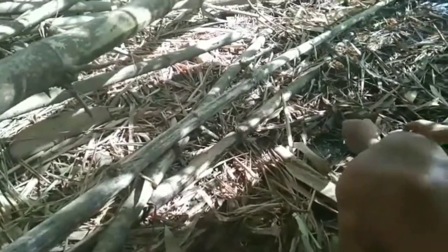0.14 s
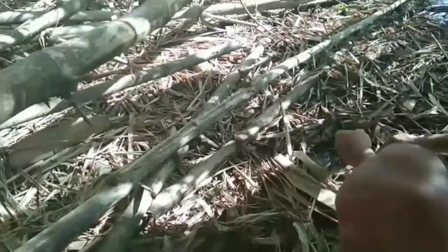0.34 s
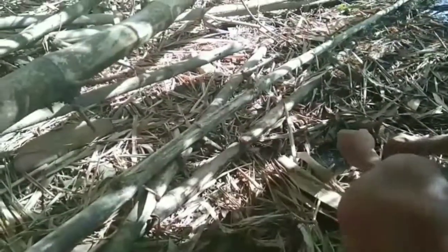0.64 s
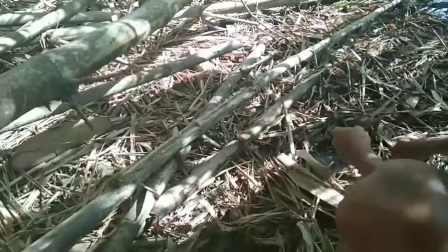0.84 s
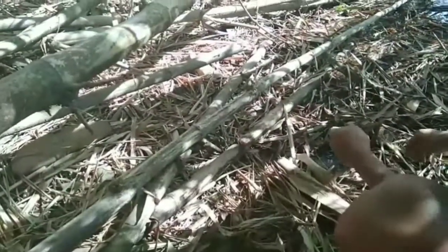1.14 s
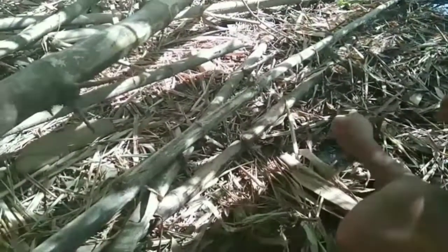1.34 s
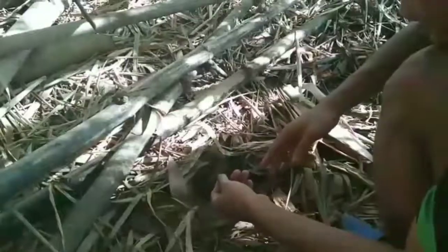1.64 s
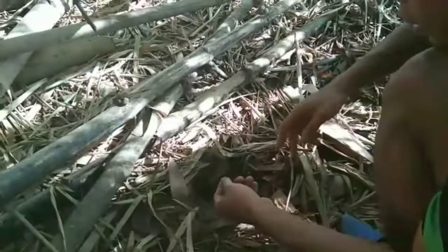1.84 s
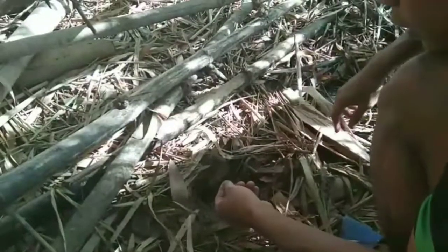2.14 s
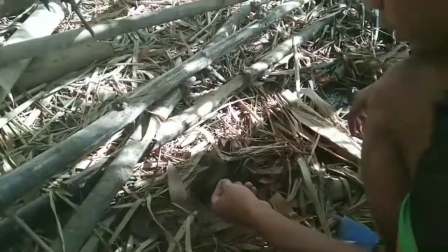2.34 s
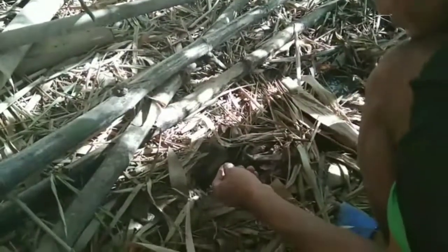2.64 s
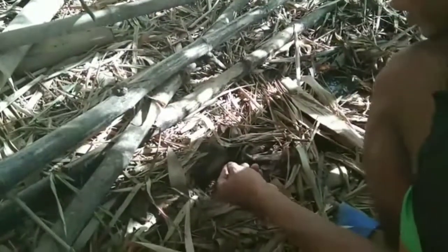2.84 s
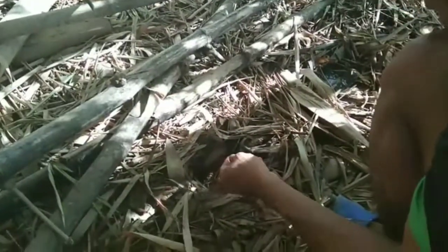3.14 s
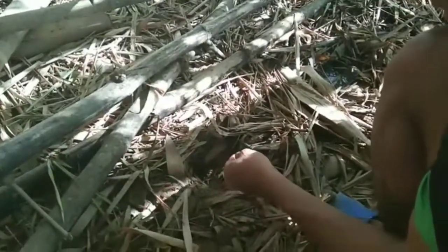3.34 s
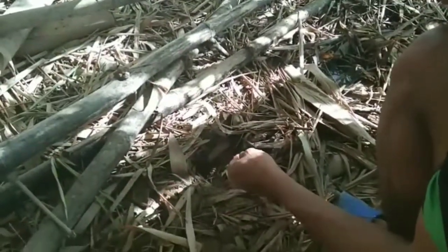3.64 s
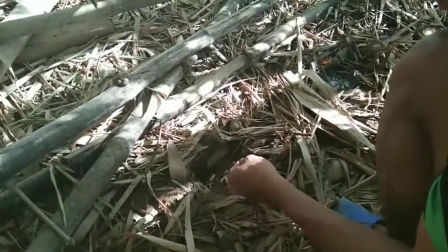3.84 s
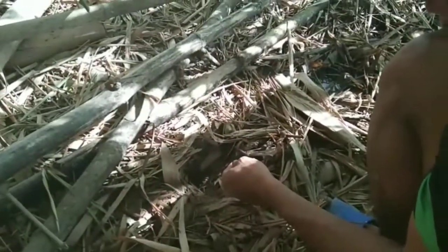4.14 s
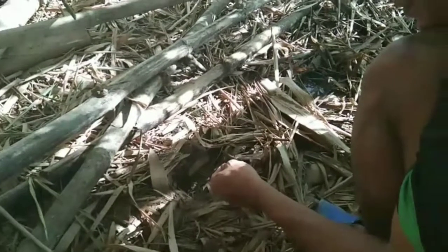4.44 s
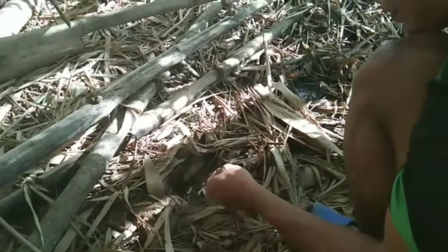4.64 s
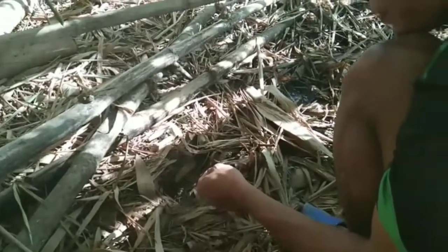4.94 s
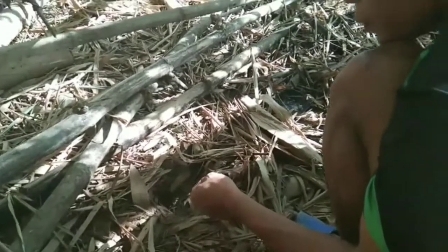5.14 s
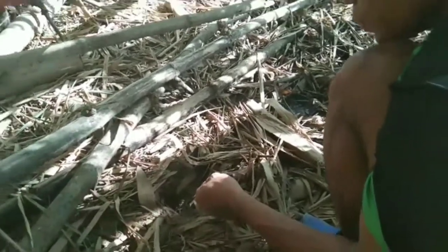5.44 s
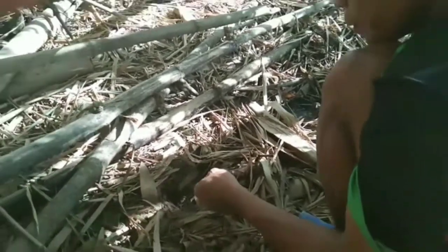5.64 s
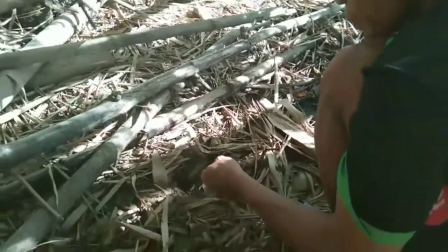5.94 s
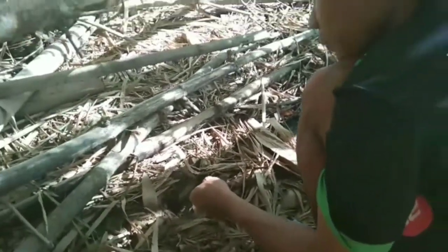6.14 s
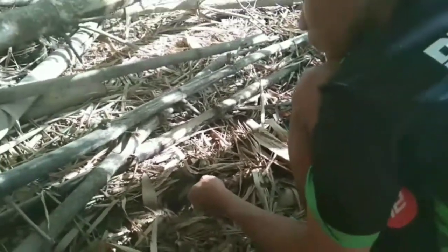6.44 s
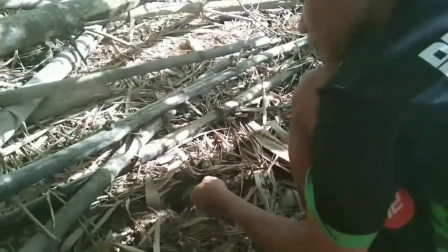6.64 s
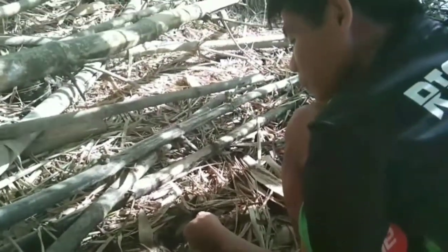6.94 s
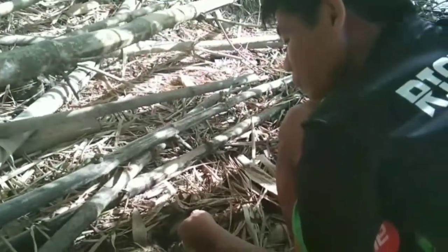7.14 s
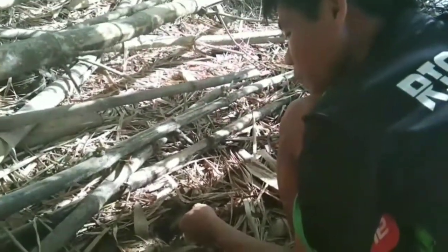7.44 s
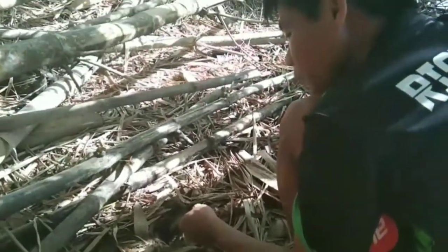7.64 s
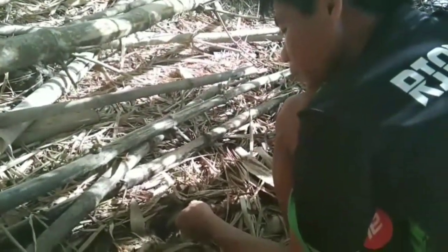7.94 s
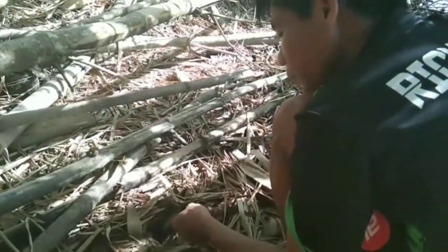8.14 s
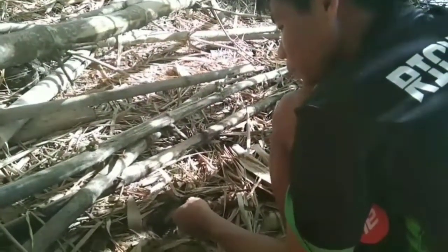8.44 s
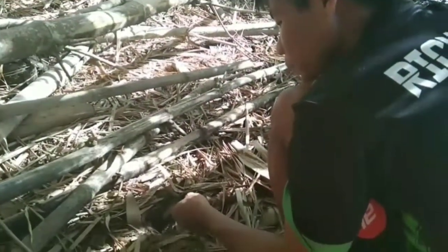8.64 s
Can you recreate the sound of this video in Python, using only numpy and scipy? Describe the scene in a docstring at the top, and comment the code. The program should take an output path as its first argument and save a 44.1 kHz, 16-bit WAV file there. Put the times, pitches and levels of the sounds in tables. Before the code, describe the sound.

A hand rummages in dry leaf litter in a bamboo grove, close to one small microphone, over a soft, steady high hiss of distant leaves and insects and a very faint rumble of air. The rustling starts lightly. From 0.5 to 1.5 seconds a bamboo pole creaks in a slow string of ringing ticks. Crunching then grows, with a crisp snap at 1.8 seconds, hissy sliding leaves, and the loudest crack at 2.7 seconds. From about 3.3 to 4.7 seconds the hand is quieter, leaving scattered clicks and faint hollow knocks. A second busy spell runs from 4.8 to 6.3 seconds, with a sharp snap at 5.3 and a leaf scraping after it. Lighter crackling and tiny splinter ticks follow, then a cluster of snaps between 7.5 and 8 seconds. A few small grabs and clicks continue until nearly 9 seconds.

```python
"""Bamboo grove: a hand works in dry leaf litter under fallen culms, close to one small microphone.
Leaves crunch and hiss in clumps of tiny breaks, and sing in narrow bands as they slide.
A culm creaks in slow stick-slip, each slip ringing its modes. Stalks snap, splinters tick,
hollow pieces knock. Behind: the steady hiss of the grove and a low rumble of air."""
import sys
import numpy as np
from scipy import signal
from scipy.io import wavfile
from scipy.ndimage import uniform_filter1d

SR = 44100
rng = np.random.default_rng(int(sys.argv[2]) if len(sys.argv) > 2 else 0)


def unload_wav(signal):
    """Save mono or channel-first audio to the path in sys.argv[1] as 16-bit WAV at rate SR, clipped to [-1, 1]."""
    wavfile.write(
        sys.argv[1],
        SR,
        np.round(np.clip(np.atleast_2d(signal).T, -1, 1) * 32767).astype(np.int16),
    )


N = 388080

# hand in the litter: (time [s], crunch [dB], crunch centre [Hz], stir [dB], hiss [dB], hiss centre [Hz])
HAND_PATH = [(0, -57, 2350, -70.5, -56.5, 6900), (.42, -59.5, 2320, -67, -56, 6900),
             (1.45, -57, 2230, -64, -55.5, 6450), (1.9, -53.5, 2300, -67.5, -51.5, 6100),
             (2.01, -50, 2400, -70, -51, 6700), (2.12, -49.5, 2650, -62, -45, 6900),
             (2.35, -48.5, 2400, -65.5, -45, 6930), (2.44, -52, 2010, -64, -50, 6750),
             (2.63, -45, 2210, -63.5, -45.5, 6800), (2.88, -46.5, 2140, -62, -39.5, 6840),
             (2.93, -52, 2080, -60.5, -49, 6700), (3.1, -46.5, 2780, -65, -41.5, 7000),
             (3.22, -50.5, 2360, -64, -47.5, 6800), (3.5, -58.5, 2300, -72, -52.5, 6550),
             (4.0, -63.5, 2400, -78, -58, 6160), (4.7, -56.5, 2380, -68.5, -54.5, 6360),
             (5.0, -46, 2460, -58.5, -45, 6900), (5.1, -52.5, 2580, -58, -49.5, 6800),
             (5.29, -44.5, 2400, -54.5, -42, 6800), (5.79, -53.5, 2280, -65, -51, 6640),
             (6.25, -51, 2180, -59.5, -49.5, 6650), (6.4, -57, 2230, -68, -52.5, 6470),
             (7.3, -57.5, 2420, -67.5, -54.5, 6600), (7.65, -58, 2380, -71.5, -54.5, 6370),
             (7.95, -48, 2320, -66, -46, 6860), (8.05, -52.5, 2270, -68, -49.5, 6900),
             (8.55, -55.5, 2450, -74, -52.5, 6600), (8.8, -57, 2310, -65, -54, 6760)]
# finger grabs: (time [s], crunch [dB], crunch centre [Hz], hiss [dB], t60 [s])
FINGER_GRABS = [(.04, -56, 2500, -47.5, 0.13), (.49, -48, 2500, -56, 0.4), (.62, -53.5, 2300, -47.5, 0.32),
                (.94, -52, 2300, -50, 0.3), (1.515, -48.5, 1600, -49, 0.11), (1.597, -43, 1660, -48, 0.17),
                (1.689, -45.5, 1600, -47, 0.25), (1.814, -41, 1700, -45, 0.15),
                (1.943, -43.5, 1690, -60, 0.092), (1.983, -42.5, 1700, -52, 0.06),
                (2.101, -42.5, 1600, -56, 0.21), (2.263, -44, 1500, -53, 0.11),
                (2.413, -44.5, 1500, -63, 0.14), (2.487, -44, 1300, -49, 0.095),
                (2.54, -49.5, 1400, -46, 1), (2.899, -38, 2600, -39, .08), (3.66, -53.5, 2100, -58, 0.32),
                (4.035, -52, 2570, -46, 0.62), (4.24, -50, 2450, -45, 0.23), (4.43, -58, 2400, -48, 0.47),
                (4.55, -62, 2450, -54, .2), (4.615, -56, 2300, -50, 0.11), (4.785, -49, 1400, -59, 0.29),
                (4.87, -43, 2350, -58, 0.081), (5.13, -55, 2500, -43.5, 0.28),
                (5.72, -51, 2300, -44.5, 0.2), (5.88, -52.5, 2260, -50, 0.33), (6.2, -63, 2200, -47, 0.16),
                (6.43, -50.5, 2330, -49.5, 0.21), (6.66, -55.5, 2240, -55, 0.36),
                (6.93, -56.5, 2360, -55, 0.62), (7.36, -52.5, 2220, -63, 0.16),
                (8.28, -58, 2250, -58, 0.27), (8.39, -47, 2300, -47, 0.12), (8.709, -46, 1920, -48, 0.15)]
# leaf spectra: (frequency [Hz], density [dB])
CRUNCH_SPECTRUM = [(400, -27.5), (800, -4.5), (1400, -2.5), (2400, 1.5), (3300, -2.5), (4500, -1),
                   (6500, -30.5)]
STIR_SPECTRUM = [(120, -30), (250, -3), (340, 0), (450, -3), (600, -5), (800, -11), (1500, -29)]
HISS_SPECTRUM = [(2060, -18), (3500, -5.5), (5060, -1), (7270, 1), (7700, 0.5), (8450, -4.5), (10900, -19),
                 (12000, -27.5), (14800, -19), (15600, -21)]
# stiff leaves ringing in the crunch: (frequency [Hz], width [Hz], level [dB])
STIFF_LEAF_BANDS = [(1310, 730, 7.5), (2070, 1100, -1), (2970, 770, 1)]
# static treble resonances that colour the rustling hiss: (frequency [Hz], width [Hz], level [dB])
HISS_BANDS = [(4500, 500, 5), (5660, 740, -0.5), (7400, 780, -3)]
# stalks and leaves breaking:
# (time [s], ring peak [dB], ring [Hz], crack peak [dB], crack [Hz], drag [0 clean, 1 slow tear])
STALK_SNAPS = [(.2565, -50, 2300, -39, 5200, .04), (1.5482, -38, 2250, -40, 7240, .04),
               (1.6163, -45, 1650, -30.5, 4680, .048), (1.7644, -45, 2280, -32, 5500, 0.17),
               (1.809, -18.5, 2200, -22, 4360, 0.16), (1.9379, -32.5, 2060, -34, 5760, .32),
               (2.036, -31.5, 2460, -31, 7300, 0.41), (2.0954, -30, 2860, -46, 7160, 0.78),
               (2.1303, -41, 2440, -30, 6870, .04), (2.4077, -30, 2900, -49, 6640, 0.27),
               (2.529, -27.5, 1620, -35, 6960, 1), (2.5422, -29, 1500, -38, 6900, 0.26),
               (2.562, -27.5, 1480, -37, 6890, 1), (2.583, -27.5, 2830, -42, 7210, 0.26),
               (2.6878, -16, 2250, -10, 4170, 0.13), (2.706, -31, 1900, -27, 4410, 0.36),
               (2.74, -38, 1560, -41, 7200, 0.21), (2.775, -37, 2200, -31, 4500, .04),
               (2.852, -38, 2200, -34, 4560, .4), (2.877, -32.5, 2500, -31, 6010, 0.68),
               (2.901, -32, 1380, -29, 4500, 0.61), (2.958, -33, 1300, -26, 7900, 0.094),
               (3.0805, -28, 2930, -34, 5850, 0.44), (3.1534, -27.5, 2780, -31, 7630, .04),
               (3.7764, -37.5, 2240, -39, 5560, .04), (4.028, -40, 2070, -33, 6040, 0.84),
               (4.236, -37.5, 2820, -40, 5760, 0.12), (4.552, -37.5, 2460, -36, 6000, 0.41),
               (4.859, -32, 2600, -25, 7050, 0.24), (4.881, -31, 1650, -35, 4870, 0.043),
               (4.9051, -28.5, 1670, -22.5, 5140, 0.092), (4.9635, -40, 2590, -26, 7600, .04),
               (4.9956, -32, 2400, -29, 7640, 0.27), (5.1226, -35, 2800, -35, 7160, 0.27),
               (5.158, -36, 2610, -38, 6800, .3), (5.177, -34, 2250, -40, 6800, .1),
               (5.188, -29.5, 2280, -28, 6840, 0.054), (5.249, -36, 1500, -41, 7000, .1),
               (5.2844, -13, 2300, -23, 4170, 0.089), (5.2913, -28, 2100, -36, 4250, .1),
               (5.337, -28, 2260, -29, 7160, .04), (5.3584, -32, 2250, -40, 7740, 0.2),
               (5.4805, -31, 2550, -42, 6030, .04), (5.51, -28, 2270, -38, 7430, 0.044),
               (5.643, -35, 2380, -47, 6190, 0.17), (5.657, -31, 2230, -47, 5220, 0.12),
               (5.6678, -34, 2000, -35, 7200, .04), (5.723, -36, 2190, -36, 6080, .04),
               (5.784, -32, 3040, -39, 6660, .04), (5.873, -40, 2480, -30, 6050, .46),
               (5.8875, -39, 2220, -26, 5900, .04), (5.982, -42, 1630, -39, 6890, .08),
               (6.1596, -35.5, 1960, -24.5, 5100, 0.12), (6.213, -38, 2300, -25, 7700, 0.063),
               (6.497, -36, 2330, -38, 7500, .04), (6.752, -34.5, 1480, -55, 4850, 0.61),
               (6.8259, -51, 2540, -33, 6270, .099), (6.935, -42, 2060, -35, 7400, .04),
               (7.1967, -38, 2270, -32, 6240, 0.044), (7.3145, -33.5, 2300, -27, 7400, 0.13),
               (7.363, -42.5, 1470, -36, 5210, 0.13), (7.5638, -23.5, 2630, -30.5, 4350, 0.13),
               (7.5955, -44, 1510, -34, 5460, 0.24), (7.6195, -38, 2340, -38, 5940, 0.076),
               (7.6988, -30, 3100, -26, 5600, 0.15), (7.8248, -38, 2300, -34, 4500, .04),
               (7.8302, -32, 1740, -36, 7590, 0.05), (7.87, -30, 2300, -39, 4000, .11),
               (7.919, -47, 2300, -37, 8050, .04), (7.902, -24, 2700, -28, 7500, 0.044),
               (7.9311, -23, 2400, -22, 5660, 0.043), (8.0626, -40, 1600, -32, 7750, .04),
               (8.109, -52, 1860, -29, 7700, .04), (8.2733, -35, 2100, -36, 7300, 0.076),
               (8.358, -43, 2350, -33, 5730, 0.47), (8.6587, -33, 1860, -34, 7560, 0.22),
               (8.7108, -41, 2780, -32, 6960, .16), (8.7377, -39, 2080, -37, 7130, .04)]
# crack of a snap: (frequency [Hz], density [dB])
CRACK_SPECTRUM = [(1500, -49.5), (3200, -7), (4300, 12.5), (7300, 10), (9400, -5), (12000, -67.5)]
# culm slips: (time [s], peak [dB])
CULM_SLIPS = [(0.471, -40.5), (0.551, -36), (0.624, -34.5), (0.695, -33), (0.76, -33), (0.821, -35),
              (0.876, -33.5), (0.929, -35), (0.98, -37), (1.034, -34), (1.086, -36.5), (1.138, -36.5),
              (1.193, -35), (1.25, -36.5), (1.307, -38.5), (1.377, -37), (1.457, -35)]
# culm modes: (frequency [Hz], level [dB], t60 [s])
CULM_MODES = [(370, -15.5, 0.12), (505, -6, 0.055), (589, -6.5, 0.1), (865, -12, 0.06), (1085, -5, 0.045),
              (1430, -12.5, 0.085), (1848, -8.5, 0.055), (1961, -9, 0.05), (2230, -20, 0.078),
              (2334, -4, .025), (2430, 2, 0.045), (2530, 3, 0.03), (2750, -6.5, 0.022), (2868, -3, 0.036),
              (3090, -8, .02), (3470, -10, 0.03), (6100, 1, 0.018), (6500, 3, 0.012), (7000, 1.5, 0.012)]
# sliding leaves: (start [s], length [s], level [dB], centre [Hz], width [Hz], flutter [dB])
LEAF_SLIDES = [(2.067, 0.29, -44.5, 6950, 950, 2.5), (2.5, 0.14, -40.5, 6800, 1400, -2),
               (2.162, 0.23, -52, 2550, 750, 0), (5.27, 0.69, -55, 2220, 660, 6.5),
               (7.798, 0.23, -54, 1970, 730, 3.5)]
# hollow pieces: (time [s], peak [dB], ring [Hz], t60 [s])
HOLLOW_KNOCKS = [(0.353, -39.5, 496, 0.038), (0.467, -44, 460, 0.068), (2.687, -26.5, 1110, 0.015),
                 (3.659, -46, 1350, 0.05), (4.024, -45, 720, 0.051), (4.247, -49, 1200, 0.076),
                 (4.777, -40, 1200, 0.04), (4.795, -43, 320, 0.09), (5.16, -40, 1160, .04),
                 (5.2844, -37, 523, 0.027), (6.035, -52, 254.5, 0.3), (6.266, -41, 854, 0.062),
                 (6.753, -45, 448, 0.059), (8.658, -35, 1220, 0.0073), (8.707, -43, 1110, 0.034)]
# fine splinters: (time [s], peak [dB])
SPLINTER_TICKS = [(0.7065, -42), (0.957, -41), (1.809, -23.5), (2.687, -45), (2.9573, -39), (4.9922, -32),
                  (5.1224, -34), (5.247, -30), (5.3823, -33), (5.7829, -42), (5.981, -38), (6.188, -34),
                  (6.4344, -38), (6.4968, -38.5), (7.1965, -43), (7.256, -47), (7.298, -41), (7.3135, -41),
                  (7.481, -46), (7.5645, -43), (7.577, -41), (7.6187, -42), (7.697, -36), (7.9001, -42),
                  (7.99, -37), (8.106, -39), (8.273, -39), (8.659, -39)]
# splinter tick: (frequency [Hz], density [dB])
TICK_SPECTRUM = [(5000, -45), (8000, 8.5), (10000, -8.5), (12000, -15), (15000, -12)]
# far leaves and insects: (frequency [Hz], density [dB])
GROVE_SPECTRUM = [(15, -47), (25, -13), (101, -0.5), (247, -7), (379, -4), (584, -6), (1500, -6),
                  (2430, -2), (3740, -8.5), (4500, -6.5), (5760, 1.5), (7140, 0.5), (7750, -1.5),
                  (8860, -14.5), (11600, -31), (15600, -31)]
# air puffs: (time [s], level [dB])
AIR_PUFFS = [(0.1, -61.5), (6.85, -64), (7.36, -76)]

GRAB_RISE_S, GRAB_STIR_DB = 0.013, -13  # stir re the grab's crunch
RING_T60_S, SPLINTER_T60_S = .005, .006
SPLINTER_DB, SPLINTER_LOSS_DB_PER_DB = -9, .3  # re a -25 dB crack; harder breaks ring less
SMALL_RING_DB, SMALL_CRACK_DB, SMALL_TICK_DB = 5, 12, 10  # re hand level
SMALL_SPREAD_DB, HAND_CAP_DB = 4, -55
SCRATCH_DB, SCRATCH_T60_S = -7, 0.11  # re slip peak
SLIDE_FADE_S = 0.061
GROVE_DB, BREEZE_DB, PUFF_HALF_S = -53, -70.5, 0.08
CUTOFF_HZ = 15650


def amp(db):
    return 10 ** (np.asarray(db) / 20)


def unit_rms(x):
    return x / np.sqrt(np.mean(x ** 2) + 1e-20)


def unit_peak(x):
    return x / abs(x).max()


def decay(t60_s, t):
    return amp(-60 * t / t60_s)


def ring(hz, t60_s, t):
    return decay(t60_s, t) * np.sin(2 * np.pi * hz * t)


def add(mix, start_s, sound):
    part = mix[round(start_s * SR):][:len(sound)]
    part += sound[:len(part)]


def butter(x, hz, kind, order=2):
    return signal.sosfilt(signal.butter(order, hz, kind, fs=SR, output="sos"), x)


def response(spectrum, size=4096):
    """Minimum-phase impulse response of a spectrum."""
    knots_hz, db = np.transpose(spectrum)
    hz = abs(np.fft.fftfreq(size, 1 / SR))
    gain_db = np.maximum(np.interp(np.log(hz + 1), np.log(knots_hz), db), -100)
    log_response = np.conj(signal.hilbert(np.log(amp(gain_db))))
    return np.fft.ifft(np.exp(log_response)).real[:size // 2]


def drift(smooth_s):
    """Smoothed noise, unit RMS."""
    size = max(int(smooth_s * SR), 2)
    return unit_rms(uniform_filter1d(uniform_filter1d(rng.standard_normal(N), size), size))


def resonate(x, hz, width_hz):
    """Resonance: shift to 0 Hz, smooth, shift back."""
    carrier = np.exp(2j * np.pi * hz * np.arange(len(x)) / SR)
    pole = np.exp(-np.pi * width_hz / SR)
    return 2 * (carrier * signal.lfilter([1 - pole], [1, -pole], x / carrier)).real


def litter():
    """The hand crushes and stirs leaves; larger leaves crunch lower."""
    times_s, *columns = np.transpose(HAND_PATH)
    t = np.arange(N) / SR
    crunch_db, hand_hz, stir_db, hiss_db, hiss_hz = (np.interp(t, times_s, c) for c in columns)
    grab_power, grab_hiss_power, grab_power_hz = grabs()
    crunch_power = amp(2 * crunch_db) + grab_power
    stir_power = amp(2 * stir_db) + amp(2 * GRAB_STIR_DB) * grab_power
    hiss_power = amp(2 * hiss_db) + grab_hiss_power
    crunch_hz = (hand_hz * amp(2 * crunch_db) + grab_power_hz) / crunch_power
    crunch = crackle(CRUNCH_SPECTRUM, per_s=700, spread_db=5.0, clump_db=2.2, rub_gain=1.1)
    crunch = unit_rms(1.7 * crunch + band_ring(crunch, STIFF_LEAF_BANDS, crunch_hz, reach_hz=520))
    stir = crackle(STIR_SPECTRUM, per_s=300, spread_db=2.0, clump_db=2.0, rub_gain=0.6)
    hiss = crackle(HISS_SPECTRUM, per_s=900, spread_db=2.5, clump_db=1.6, rub_gain=1.3)
    hiss = unit_rms(hiss + band_ring(hiss, HISS_BANDS, hiss_hz, reach_hz=840))
    return np.sqrt(crunch_power) * crunch + np.sqrt(stir_power) * stir + np.sqrt(hiss_power) * hiss


def grabs():
    """Finger grab envelopes: crunch power, hiss power, crunch power times centre Hz."""
    t, out = np.arange(12000) / SR, np.zeros((3, N))
    for time_s, crunch_db, hz, hiss_db, t60_s in FINGER_GRABS:
        envelope = np.minimum(t / GRAB_RISE_S, 1) * decay(t60_s, np.maximum(t - GRAB_RISE_S, 0))
        for row, peak in zip(out, (amp(2 * crunch_db), amp(2 * hiss_db), hz * amp(2 * crunch_db))):
            add(row, time_s - GRAB_RISE_S, peak * envelope ** 2)
    return out


def crackle(spectrum, per_s, spread_db, clump_db, rub_gain):
    """Tiny unequal breaks in clumps, each shaking its leaf; rubbing fills the gaps."""
    sizes = amp(spread_db * np.minimum(rng.exponential(1, N), 4.5)) * rng.choice([-1., 1.], N)
    breaks = sizes * (rng.random(N) < per_s / SR)
    rattle = rng.standard_normal(300) * decay(0.014, np.arange(300) / SR)
    drive = unit_rms(signal.oaconvolve(breaks, rattle)[:N]) + rub_gain * rng.standard_normal(N)
    drive *= amp(clump_db * drift(0.0084))
    return unit_rms(signal.oaconvolve(drive, response(spectrum))[:N])


def band_ring(x, bands, centre_hz, reach_hz):
    """Static resonances, weighted by nearness to the moving centre."""
    weights = [np.exp(-.5 * ((hz - centre_hz) / reach_hz) ** 2) for hz, _, _ in bands]
    rings = [amp(db) * unit_rms(resonate(x, hz, width_hz)) for hz, width_hz, db in bands]
    return sum(w * r for w, r in zip(weights, rings)) / np.sqrt(sum(w ** 2 for w in weights))


def snaps():
    """A two-step break and a tearing rattle drive the piece's short ring and a bright crack."""
    t, out = np.arange(4000) / SR, np.zeros(N)
    ring_t, edge = t[:600], unit_peak(response(CRACK_SPECTRUM)[:600])
    times_s, levels_db, pitch, tear = small_breaks(hand_column=1, count=50)  # follow the crunch
    small_snaps = list(zip(times_s, levels_db + SMALL_RING_DB, 1500 + 1400 * pitch,
                           levels_db + SMALL_CRACK_DB, 7600 - 3000 * tear, 0.47 * tear))
    for time_s, ring_db, hz, crack_db, crack_hz, drag in STALK_SNAPS + small_snaps:
        drag = np.clip(drag, .02, 1)
        force = (0.13 + 0.17 * drag) * rng.standard_normal(len(t)) * decay(0.0081 + 0.12 * drag, t)
        force[[8, rng.integers(40, 60)]] += [1, -.35]  # steps about 1 ms apart
        modes = ring(hz, RING_T60_S, ring_t)
        modes += .55 * ring(1.35 * hz, .004, ring_t) + .15 * ring(.75 * hz, .004, ring_t)
        # tearing shakes the overtones
        modes += 0.41 * drag * (ring(1.7 * hz, 0.0084, ring_t) + ring(2.19 * hz, 0.015, ring_t))
        modes = butter(modes, 0.69 * hz, "highpass", order=3)  # no radiation below the lowest mode
        piece, crack = (unit_peak(signal.oaconvolve(force, h)[:len(t)]) for h in (modes, edge))
        splinter = unit_peak(ring(crack_hz, SPLINTER_T60_S, t) * (1 - np.exp(-t / .0008)))
        splinter_db = SPLINTER_DB - SPLINTER_LOSS_DB_PER_DB * (crack_db + 25)
        crack = unit_peak(crack + amp(splinter_db) * splinter)
        add(out, time_s, amp(ring_db) * piece + amp(crack_db) * crack)
    return out


def small_breaks(hand_column, count):
    """Random breaks, denser under a busy hand: time [s], level [dB], pitch [0-1], tear [0-1]."""
    quantile, size, pitch, tear = rng.random((count, 4)).T
    hand_s, hand_db = np.transpose(HAND_PATH)[[0, hand_column]]
    t = np.linspace(0, N / SR, 500)
    activity = np.cumsum(amp(np.interp(t, hand_s, hand_db)))
    times_s = np.interp(quantile, activity / activity[-1], t)
    capped_db = np.minimum(np.interp(times_s, hand_s, hand_db), HAND_CAP_DB)
    return times_s, capped_db + SMALL_SPREAD_DB * (2 * size - 1), pitch, tear


def creak():
    """Each slip rings the culm, low modes building last; a dry scratch trails it."""
    t, out = np.arange(6000) / SR, np.zeros(N)
    for time_s, db in CULM_SLIPS:
        load_detune = 1 + .002 * rng.standard_normal(len(CULM_MODES))
        modes = np.array([amp(mode_db) * ring(hz * detune, t60_s, t) * (1 - np.exp(-t * hz / 3.2))
                          for (hz, mode_db, t60_s), detune in zip(CULM_MODES, load_detune)])
        modes[1::2] *= -1  # neighbouring modes radiate in antiphase
        release = .02 * rng.standard_normal(400) * decay(.015, t[:400])
        release[0] = 1  # impulse, then a slight scrape
        body = amp(.6 * rng.standard_normal(len(CULM_MODES))) @ modes
        scratch = butter(rng.standard_normal(len(t)) * decay(SCRATCH_T60_S, t), [1800, 3300], "bandpass")
        add(out, time_s - .0005, amp(db) * unit_peak(signal.oaconvolve(body, release)))
        add(out, time_s + .003, amp(db + SCRATCH_DB) * unit_peak(scratch))
    return out


def slides():
    """A leaf or stalk dragged over another catches and slips, singing in a narrow band."""
    out, catch = np.zeros(N), drift(0.0037)
    for start_s, length_s, db, hz, width_hz, flutter_db in LEAF_SLIDES:
        t = np.arange(0, length_s, 1 / SR)
        flutter = amp(flutter_db * catch[round(start_s * SR):][:len(t)])
        rub = rng.standard_normal(N)[:len(t)] * flutter
        rub = resonate(resonate(rub, hz, width_hz), hz, width_hz)
        fade = np.clip(np.minimum(t, length_s - t) / SLIDE_FADE_S, 0, 1)
        add(out, start_s, amp(db) * fade * unit_rms(rub))
    return out


def knocks():
    """A short shove and a scuff ring three modes of a hollow piece."""
    t, out, shove = np.arange(6000) / SR, np.zeros(N), np.hanning(18)
    for time_s, db, hz, t60_s in HOLLOW_KNOCKS:
        body = ring(hz, t60_s, t) + .9 * ring(1.8 * hz, .8 * t60_s, t)
        body += .6 * ring(2.5 * hz, .6 * t60_s, t)
        force = .05 * rng.standard_normal(500) * decay(.04, t[:500])
        force[:len(shove)] += shove / shove.sum()
        knock = butter(signal.oaconvolve(body, force), .7 * hz, "highpass")
        add(out, time_s, amp(db) * unit_peak(knock))
    return out


def ticks():
    """Tiny dry splinters: a few ms of treble noise each."""
    t, out, tip = np.arange(600) / SR, np.zeros(N), response(TICK_SPECTRUM)[:200]
    times_s, levels_db, _, _ = small_breaks(hand_column=4, count=40)  # follow the hiss
    for time_s, db in SPLINTER_TICKS + list(zip(times_s, levels_db + SMALL_TICK_DB)):
        burst = rng.standard_normal(len(t)) * decay(0.01, t)
        add(out, time_s, amp(db) * unit_peak(signal.oaconvolve(burst, tip)))
    return out


def grove():
    """Far leaves and insects blur into a hiss; level and colour wander slightly."""
    hiss = signal.oaconvolve(rng.standard_normal(N), response(GROVE_SPECTRUM))[:N]
    hiss = amp(GROVE_DB + 1.3 * drift(0.45)) * unit_rms(hiss)
    bands = [butter(hiss, hz, "bandpass", order=1) for hz in ([1500, 3500], [4500, 6500])]
    return hiss + sum(.15 * drift(.2) * band for band in bands)


def wind():
    """Air on the microphone: steady rumble plus puffs."""
    t = np.arange(N) / SR
    rumble = butter(rng.standard_normal(N), [70, 190], "bandpass")
    puffs = sum(amp(db) * np.exp(-((t - time_s) / PUFF_HALF_S) ** 2) for time_s, db in AIR_PUFFS)
    return (amp(BREEZE_DB) + puffs) * unit_rms(rumble * amp(0.47 * drift(0.021)))


def scene():
    """One microphone feeds both channels."""
    mono = grove() + wind() + litter() + slides() + creak() + snaps() + ticks() + knocks()
    return np.array([mono, mono])


def record(dry):
    """Small capsule: deep bass roll-off, then band limit."""
    capsule = butter(dry, 54, "highpass")
    lowpass = signal.firwin(1023, CUTOFF_HZ, window=("kaiser", 9), fs=SR)
    return signal.oaconvolve(capsule, lowpass[None], "same")


dry = scene()
out = record(dry)
unload_wav(out)
```